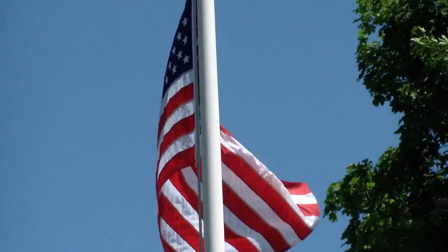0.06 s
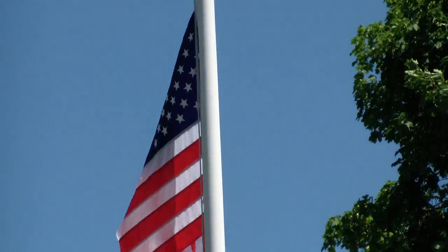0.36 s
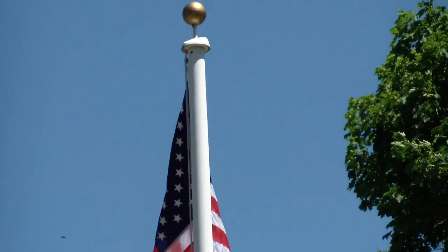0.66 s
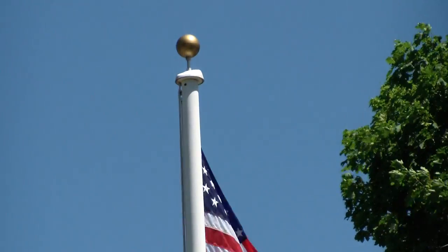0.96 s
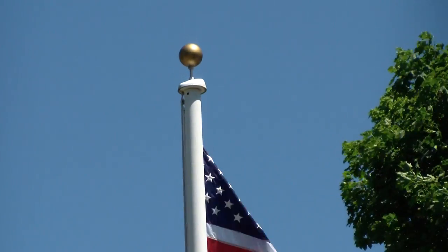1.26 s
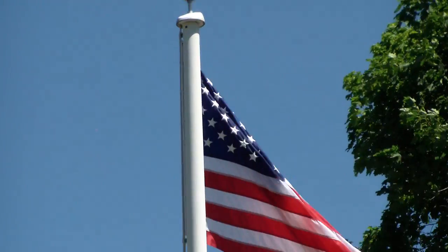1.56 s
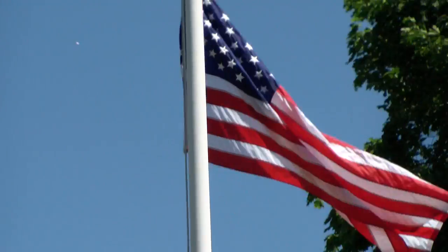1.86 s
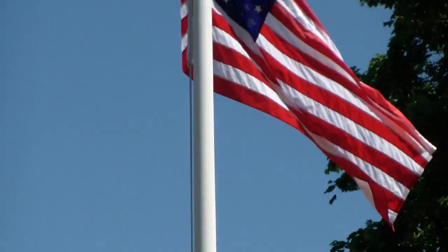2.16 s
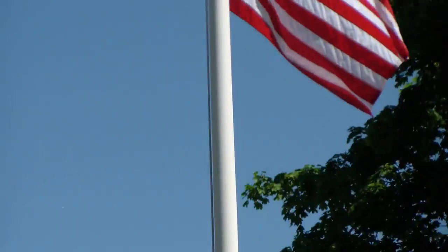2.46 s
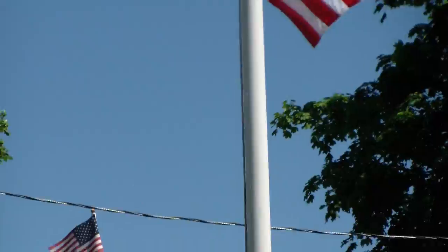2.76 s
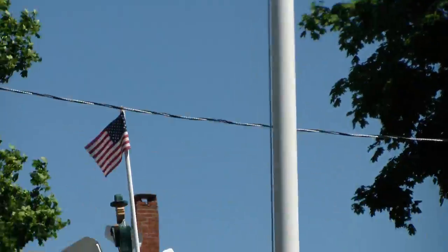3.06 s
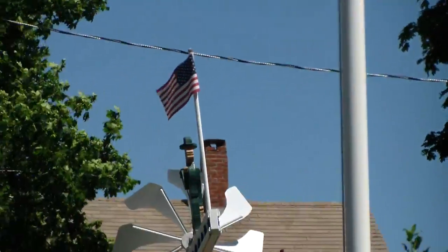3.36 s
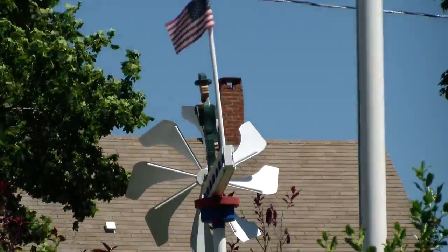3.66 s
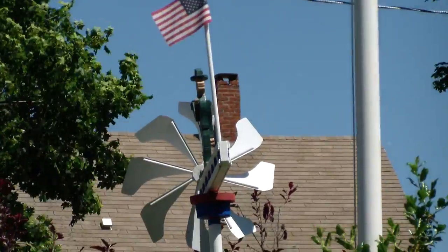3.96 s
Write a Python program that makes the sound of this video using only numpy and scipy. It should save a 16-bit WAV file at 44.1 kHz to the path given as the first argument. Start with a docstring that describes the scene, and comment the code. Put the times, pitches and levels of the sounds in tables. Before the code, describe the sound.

Gusty wind rumbles and thumps on the microphone outdoors, over faint leaf hiss.

```python
"""Gusty wind rumbles and thumps on a hand-held camera in a garden, by a flagpole.
The wind hits the camera's two microphone openings (ports). Each port has its own rumble and its
own sharp buffets, and the strongest of these overload it. Behind that, trees hiss,
a low hum sounds in the first lull, and metal fittings clink faintly on the pole."""
import sys
import numpy as np
from scipy import signal
from scipy.fft import rfft, irfft
from scipy.io import wavfile
from scipy.ndimage import uniform_filter1d

SR = 44100
rng = np.random.default_rng(int(sys.argv[2]) if len(sys.argv) > 2 else 0)


def to_wav(sig):
    """Store sig (one row per channel, or 1-D mono) as 16-bit WAV at the path in sys.argv[1].

    Samples outside -1..1 are clipped; the rate is SR.
    """
    pcm = np.clip(np.atleast_2d(sig), -1, 1) * 32767
    pcm = np.round(pcm).astype(np.int16)
    wavfile.write(sys.argv[1], SR, pcm.T)  # frames by channels


N = 176400  # 4 seconds
T = np.arange(N) / SR

# How hard the wind blows on each port. Each row: time in seconds, rumble level in dB.
LEFT_GUSTS = [(0.0, -10), (0.2, -21), (0.32, -34.5), (0.66, -23), (0.72, -7.5), (0.84, -23), (0.92, -6),
              (1.06, -13.5), (1.2, -4.5), (1.38, -10), (1.54, -7.5), (1.58, -20), (1.75, -11), (1.96, -11),
              (2.0, -21), (2.08, -8.5), (2.16, -11), (2.55, -12), (2.59, -5.5), (2.71, -10), (3.23, -8.5),
              (3.37, -16.5), (3.47, -7.5), (3.61, -11), (3.67, -16), (3.89, -5.5), (4.0, -17)]
RIGHT_GUSTS = [(0.0, -11), (0.02, -9.5), (0.06, -31), (0.14, -13), (0.34, -36), (0.66, -21.5), (0.7, -7.5),
               (0.9, -10.5), (1.3, -6.5), (1.48, -10.5), (1.64, -7.5), (1.68, -16), (1.76, -5), (2.0, -8.5),
               (2.22, -4.5), (2.25, -22), (2.29, -7), (2.87, -11), (3.33, -6.5), (3.49, -15), (3.61, -5.5),
               (3.67, -23.5), (3.79, -9), (3.93, -8), (4.0, -13.5)]
# Whirls of air (eddies) that strike a port. Each row: middle in seconds, length in seconds,
# relative thud level in dB, relative swirl level in dB, port ("L" for left, "R" for right).
BUFFET_HITS = [(.025, .04, -18.5, -41, "L"), (0.631, 0.015, -2.5, -48, "R"), (.688, .01, -13.5, -40, "L"),
               (.738, .024, -13.5, -34, "L"), (.925, .05, -10, -27, "L"), (.978, .034, -3.5, -14.5, "R"),
               (1.041, .016, -7, -11.5, "R"), (1.093, .014, -4.5, -22, "L"), (1.112, 0.0058, -4, -28, "R"),
               (1.148, 0.0083, -12, -23, "R"), (1.158, .012, 2.5, -9, "L"), (1.184, .012, -2, -16, "L"),
               (1.205, .04, -12, -21, "R"), (1.222, .032, -6, -14.5, "L"), (1.28, .045, -7.5, -16.5, "R"),
               (1.32, .06, -6.5, -17.5, "L"), (1.35, .02, -10, -19, "R"), (1.412, .045, -2.5, -15, "L"),
               (1.43, .016, -3, -17, "R"), (1.468, .025, -9, -15.5, "L"), (1.525, .01, -5.5, -20, "L"),
               (1.551, .011, -5.5, -10.5, "L"), (1.59, .012, -7, -24, "R"), (1.707, .013, -1, -8, "L"),
               (1.738, .016, -11, -32, "R"), (1.808, .022, -7.5, -10.5, "L"), (1.835, .04, -7.5, -15, "R"),
               (1.935, .05, -6, -30, "R"), (1.953, .014, -3.5, -28, "L"), (2.076, .012, -4.5, -15.5, "L"),
               (2.13, .04, -13, -30, "R"), (2.188, .028, -8, -20, "L"), (2.219, .011, -12, -12, "R"),
               (2.406, .014, -6.5, -19, "R"), (2.449, .014, -3, -14, "L"), (2.535, .045, -7, -23.5, "R"),
               (2.613, .04, -8.5, -11, "L"), (2.654, .016, -0.5, -7.5, "L"), (2.65, .016, -5, -30, "R"),
               (2.714, .012, -4, -16, "L"), (2.724, .014, -2, -32, "R"), (2.82, .048, -4, -13, "R"),
               (2.851, 0.013, 1, -6, "L"), (2.868, 0.011, 2, -4.5, "L"), (2.926, .012, -3, -13.5, "R"),
               (2.96, .03, -3, -17, "R"), (2.975, .1, -6.5, -17, "L"), (3.055, .085, -8.5, -25, "R"),
               (3.111, .012, -9.5, -16, "L"), (3.14, .02, -7.5, -18.5, "R"), (3.17, 0.02, 2, -14, "L"),
               (3.2, .018, -9, -18, "R"), (3.214, .012, -9, -17, "L"), (3.314, .018, -7, -23, "R"),
               (3.48, .014, -10, -15.5, "L"), (3.53, .012, -6.5, -19, "L"), (3.559, .016, -6, -14, "L"),
               (3.593, .012, -8, -14, "R"), (3.618, .022, -2.5, -22, "L"), (3.78, .024, -4.5, -29, "R"),
               (3.9, .016, -2, -13.5, "L"), (3.922, .035, -6.5, -20, "R"), (3.967, .034, -6, -13, "L")]
# The tone of each noise: wind rumble, thuds, fine swirls, leaves and the camera's own hiss.
# Each row: frequency in Hz, relative level in dB.
RUMBLE_TONE = [(12, -32), (25, -8), (45, -2.5), (85, -0.5), (150, -1.5), (250, -7), (400, -16),
               (700, -28.5), (1400, -52), (4000, -97)]
THUD_TONE = [(60, -13.5), (150, -1), (270, 1), (420, -5.5), (620, -15.5), (1000, -39), (3000, -85)]
SWIRL_TONE = [(200, -13), (450, -0.5), (620, 6), (800, -3), (1200, -14.5), (1800, -21), (3500, -36),
              (9000, -80)]
LEAF_TONE = [(40, 13), (90, 8), (200, 0.5), (600, 4), (1100, 0), (2000, -3.5), (3600, -1.5), (6000, -7.5),
             (10000, -11), (13000, -14), (15000, -26)]
CAMERA_HISS_TONE = [(1000, 8), (9000, 2), (13000, -9), (15000, -18)]
# How loud the leaf hiss sounds: it swells with the trees and dips as the camera turns its gain
# down in gusts. Each row: time in seconds, relative level in dB.
HEARD_HISS_LEVELS = [(0, -33.5), (.6, -31.5), (.8, -36.5), (.91, -33), (.97, -36.5), (1.0, -41.5),
                     (1.16, -39.5), (1.32, -40), (1.75, -36), (1.87, -39), (2.1, -34), (2.24, -40.5),
                     (2.6, -38), (3.2, -38), (3.35, -39), (3.65, -37.5), (3.87, -31), (3.94, -37.5),
                     (4, -35.5)]
# The path that the hum wavers around. Each row: time in seconds, pitch in Hz, level in dB.
HUM_PATH = [(0, 70.5, -37), (.17, 69, -21), (.23, 71.5, -20), (.32, 76.3, -32), (.45, 81.1, -22.5),
            (.57, 83, -19), (.65, 78.8, -17), (.72, 79.5, -33)]
# Taps on the pole. Each row: start in seconds, relative level in dB, which fitting (0, 1 or 2).
CLINK_TAPS = [(.303, -31, 0), (.739, -31, 1), (1.36, -45, 2)]
# The ringing tones of the three metal fittings, one list for each.
# Each row: pitch in Hz, relative level in dB, seconds to fade by 60 dB.
FITTING_TONES = [
    [(7680, -13, .4), (10900, 2.5, 0.29)],
    [(5800, -4, .4), (7140, -9, 0.17), (8140, 1, .17), (8660, 2, .13), (12280, -5, .12), (13970, -6, .1),
     (14910, -9, .1)],
    [(11130, -2, 0.37), (13630, 6, 0.2), (14000, -6, .3)],
]


def wind(gusts, port):
    """Rough air at one port makes a rumble that follows the gusts, with buffets on top."""
    split_hz, flutter_db = 303, 4.7
    rumble = steady(noise(RUMBLE_TONE), seconds=.035) * undb(curve(gusts))
    # Filtering forwards, then backwards, picks out the bass without delaying it.
    bass = filtered(rumble, split_hz, "low")
    bass = filtered(bass[::-1], split_hz, "low")[::-1]
    flutter = steady(undb(flutter_db * wobble(per_second=130)), seconds=.035)
    return bass + (rumble - bass) * flutter + buffets(port, flutter)


def buffets(port, flutter):
    """Each eddy hits the port with a dull thud, whose pressure swings drag crackling swirls along."""
    thud_power, swirl_power = np.zeros((2, N))
    for middle, length, thud_db, swirl_db, side in BUFFET_HITS:
        if side == port:
            span = slice(*np.searchsorted(T, [middle - 2 * length, middle + 2 * length]))
            burst = 1 / (1 + np.abs(2 * (T[span] - middle) / length) ** 8)  # flat top, steep sides
            thud_power[span] += undb(thud_db) ** 2 * burst
            swirl_power[span] += undb(swirl_db) ** 2 * burst
    eddy = steady(noise(THUD_TONE), seconds=.012)
    drag = np.abs(signal.hilbert(eddy)) ** 1.2  # rises and falls with the size of the swings
    crackle = steady(noise(SWIRL_TONE) * flutter * drag, seconds=.012)
    thuds = filtered(eddy * np.sqrt(thud_power), 560, "low", order=4)
    swirls = crackle * np.sqrt(swirl_power)
    return thuds * undb(-1.5) + swirls * undb(-2.5)


def trees():
    """Leaf hiss and distant rumble reach the two ports from all around and from the sides."""
    port_gap_m, sound_m_per_s, side_share = 0.014, 343, 0.53
    half_waves = 2 * np.fft.rfftfreq(N, 1 / SR) * port_gap_m / sound_m_per_s  # how many span the gap
    # The ports hear nearly the same bass, but tend to swing opposite ways in the high treble.
    alike = 0.93 * ((1 - side_share) * np.sinc(half_waves) + side_share * np.cos(np.pi * half_waves))
    common = irfft(rfft(noise(LEAF_TONE)) * np.sqrt((1 + alike) / 2), N)
    opposed = irfft(rfft(noise(LEAF_TONE)) * np.sqrt((1 - alike) / 2), N)
    level = undb(curve(HEARD_HISS_LEVELS) + 5.5 + 0.81 * wobble(per_second=10))
    return np.array([common + opposed, (common - opposed) * undb(0.62)]) * level


def hum():
    """A low, wavering tone rises a little and is soon buried by the wind."""
    hz = curve(HUM_PATH) * (1 + 0.043 * wobble(per_second=22))
    level = undb(curve(HUM_PATH, column=2) + 3.5 * wobble(per_second=19))
    return np.sqrt(2) * np.sin(2 * np.pi * np.cumsum(hz) / SR) * level


def clinks():
    """Small metal fittings tap the pole, rattle and ring."""
    attack_s, ring_s, rattle_db = 0.0065, .4, 5
    pan_db = np.array([[-2.5], [2.5]])  # louder on the right
    phase = np.array([[-np.pi / 2], [0]])  # a quarter cycle later on the left
    rattle = wobble(per_second=300)
    out = np.zeros((2, N))
    for start, tap_db, fitting in CLINK_TAPS:
        span = slice(*np.searchsorted(T, [start, start + ring_s]))
        age = T[span] - start
        for hz, tone_db, fade_s in FITTING_TONES[fitting]:
            ring = np.minimum(age / attack_s, 1) * np.exp(-np.log(1000) * age / fade_s)
            level = undb(tap_db + tone_db + pan_db + rattle_db * ring * rattle[span])
            out[:, span] += level * ring * np.sin(2 * np.pi * hz * age + phase)
    return out


def undb(db):
    """Turns decibels (dB) into a number to multiply a sound by."""
    return np.exp(np.asarray(db) * np.log(10) / 20)


def curve(rows, column=1):
    """Joins the values in a table column with straight lines over time."""
    rows = np.array(rows)
    return np.interp(T, rows[:, 0], rows[:, column])


def noise(tone):
    """Noise with a typical size of 1, shaped by a tone table."""
    hz, db = np.array(tone).T
    freqs = np.maximum(np.fft.rfftfreq(N, 1 / SR), 1)
    gain = undb(np.interp(np.log(freqs), np.log(hz), db))
    shaped = irfft(rfft(rng.standard_normal(N)) * gain, N)
    return shaped / shaped.std()


def wobble(per_second):
    """Glides from one random value to the next, with a typical size of 1."""
    step = max(int(SR / per_second), 1)
    glide = uniform_filter1d(rng.standard_normal(N)[np.arange(N) // step], step)
    return glide / glide.std()


def steady(x, seconds):
    """Evens out the slow swings in the strength of a noise."""
    width = int(seconds * SR)
    power = uniform_filter1d(uniform_filter1d(x ** 2, width), width)
    return x / np.sqrt(power)


def filtered(x, hz, kind, order=2):
    """Keeps what is below ("low") or above ("high") hz; a higher order cuts more steeply."""
    return signal.sosfilt(signal.butter(order, hz, kind, fs=SR, output="sos"), x)


def scene():
    """Wind on each port, over the sounds of the garden."""
    ports = np.array([wind(LEFT_GUSTS, "L"), wind(RIGHT_GUSTS, "R")])
    # The largest eddies cover both ports, so the deep bass is partly shared.
    shared = 0.26 * filtered(ports[::-1] - ports, 40, "low", order=1)
    return ports + shared + trees() + hum() + clinks()


def record(dry):
    """The camera adds faint hiss, flattens the loudest peaks and cuts the deepest bass and top treble."""
    clip_level, clip_hardness = .99, 16
    bottom_hz, top_hz = 2.4, 15200
    hissy = dry + np.array([noise(CAMERA_HISS_TONE), noise(CAMERA_HISS_TONE)]) * undb(-52)
    clipped = hissy / (0.5 + np.abs(hissy / clip_level) ** clip_hardness) ** (1 / clip_hardness)
    treble_cut = signal.ellip(8, .2, 70, top_hz, fs=SR, output="sos")
    return signal.sosfilt(treble_cut, filtered(clipped, bottom_hz, "high", order=1))


dry = scene()
out = record(dry)
to_wav(out)
```